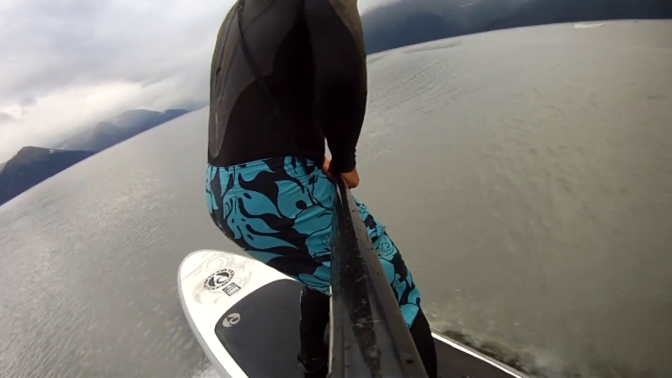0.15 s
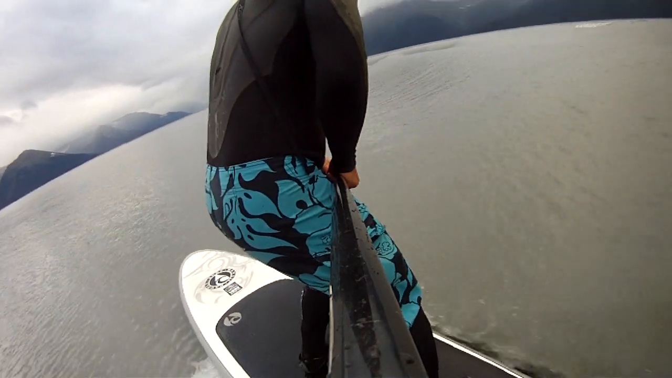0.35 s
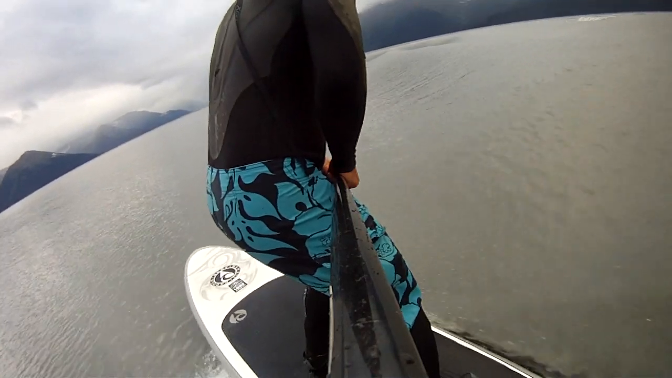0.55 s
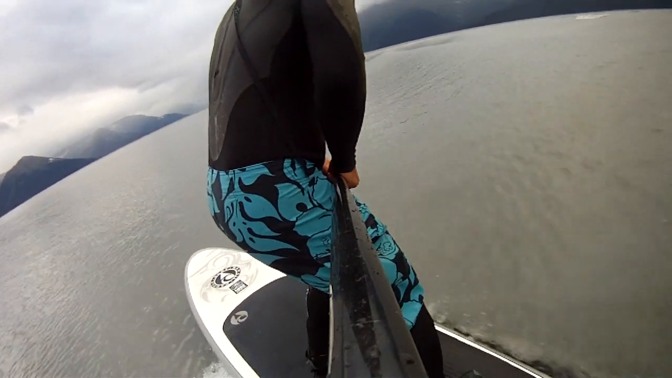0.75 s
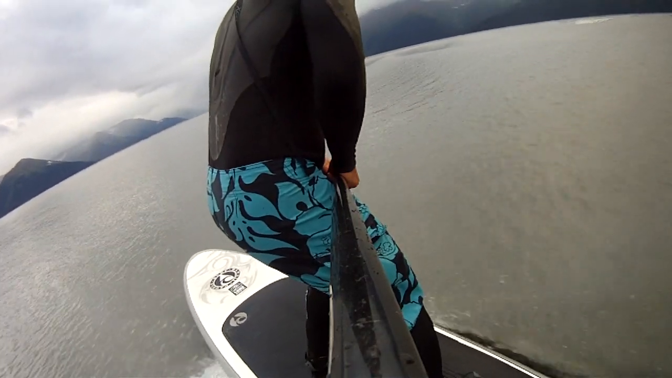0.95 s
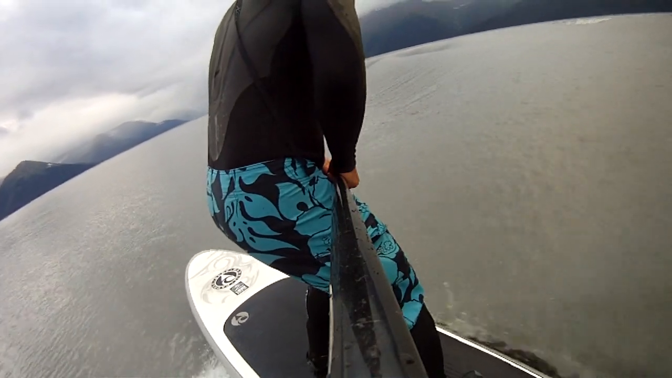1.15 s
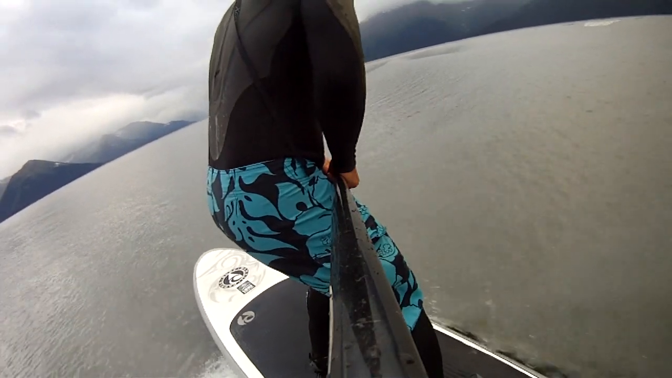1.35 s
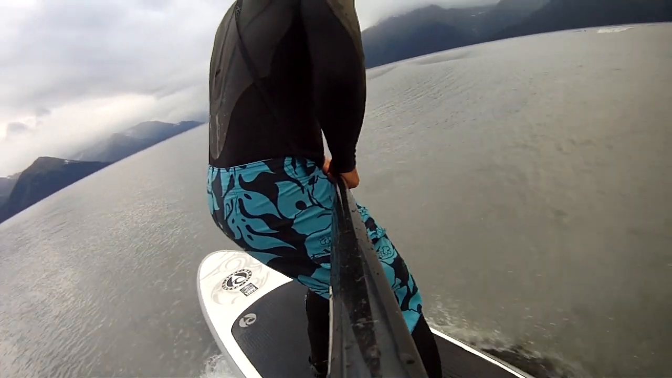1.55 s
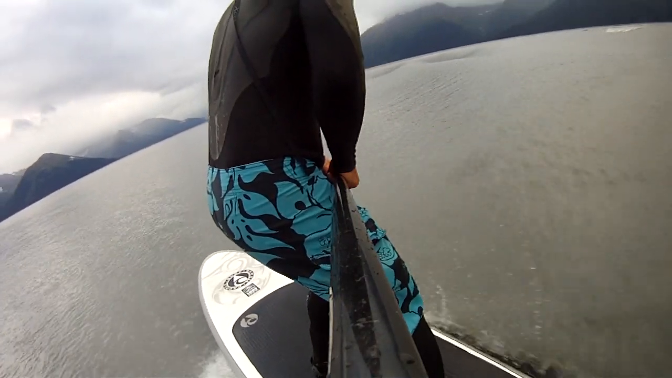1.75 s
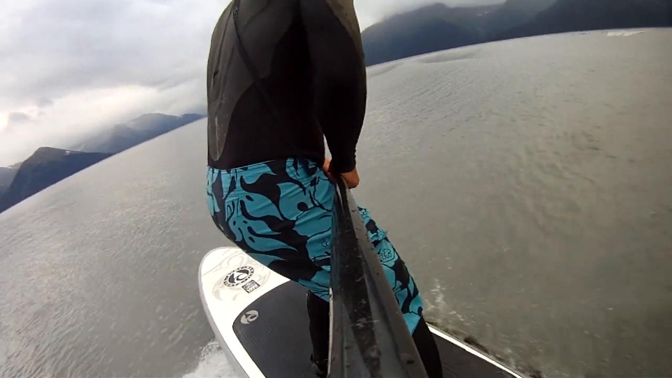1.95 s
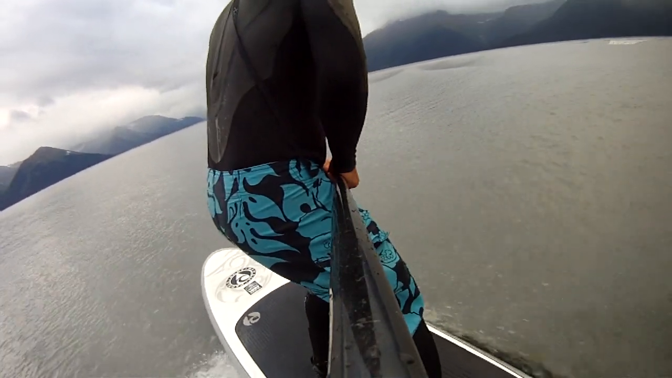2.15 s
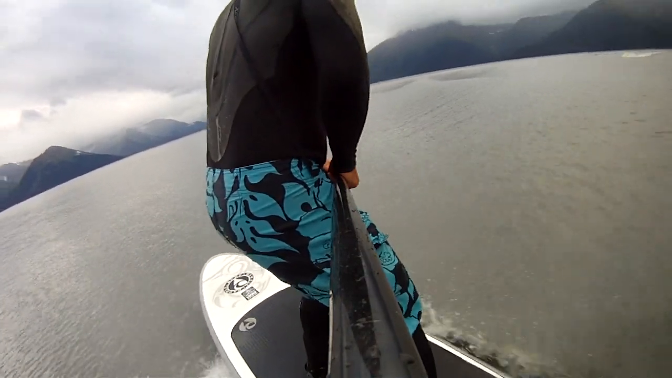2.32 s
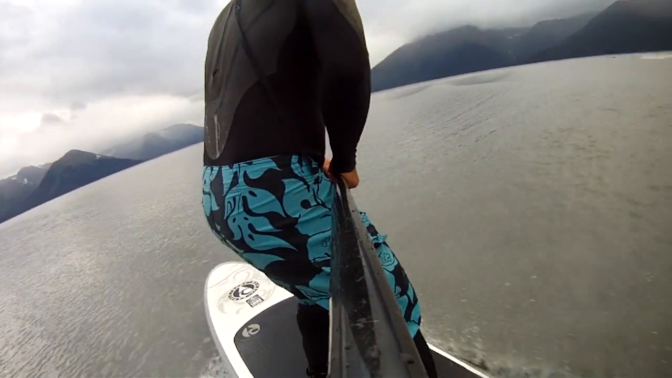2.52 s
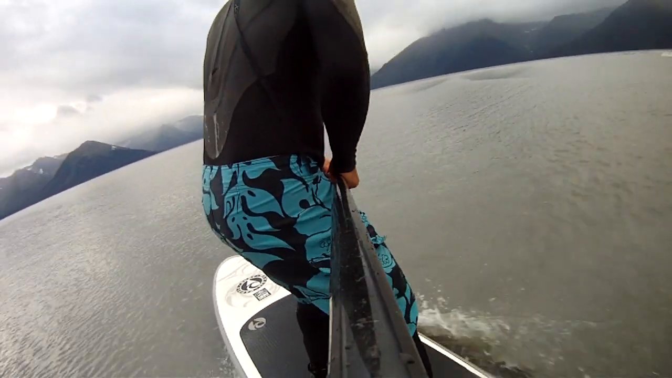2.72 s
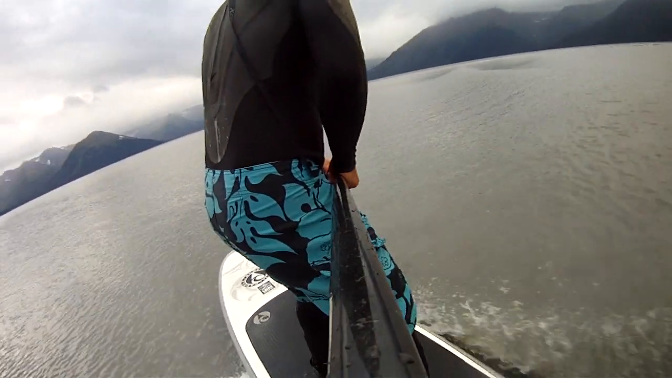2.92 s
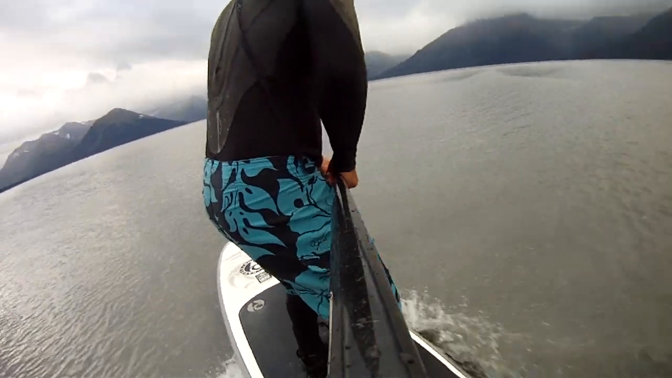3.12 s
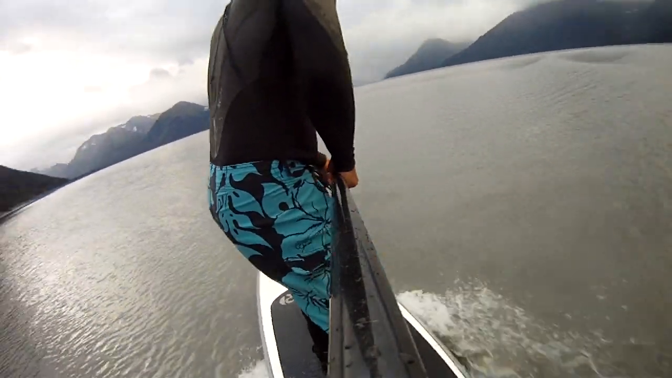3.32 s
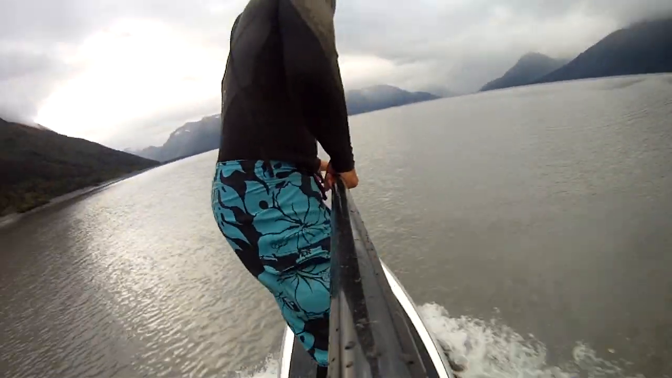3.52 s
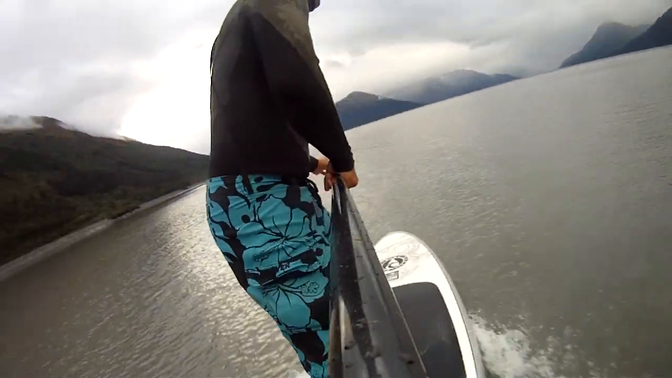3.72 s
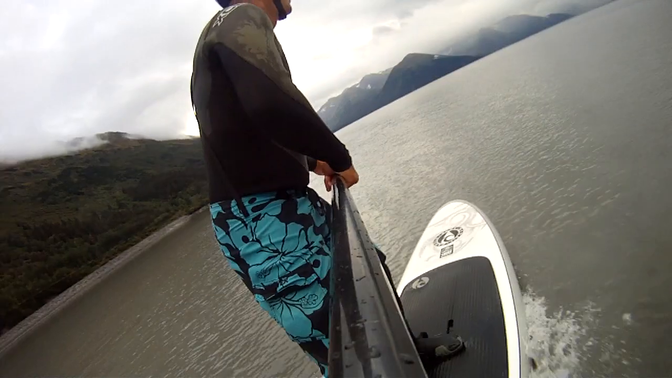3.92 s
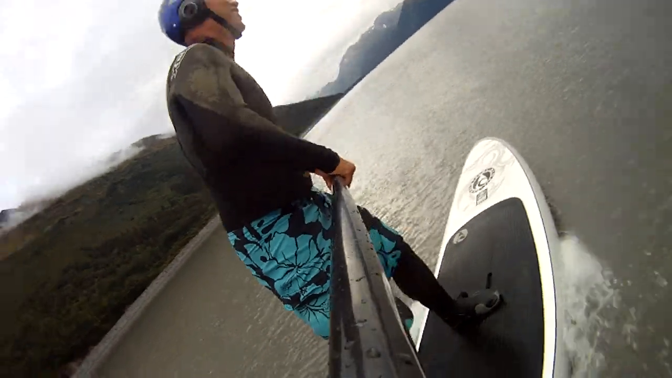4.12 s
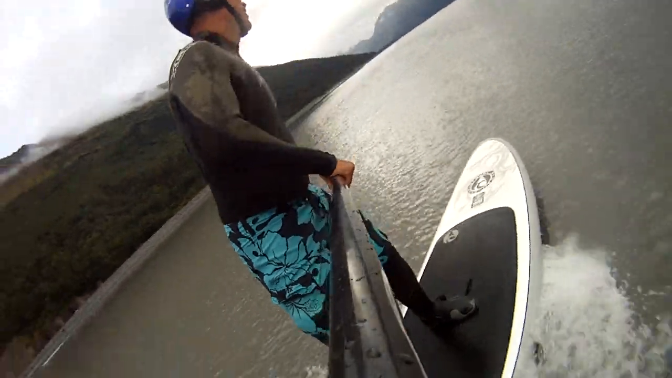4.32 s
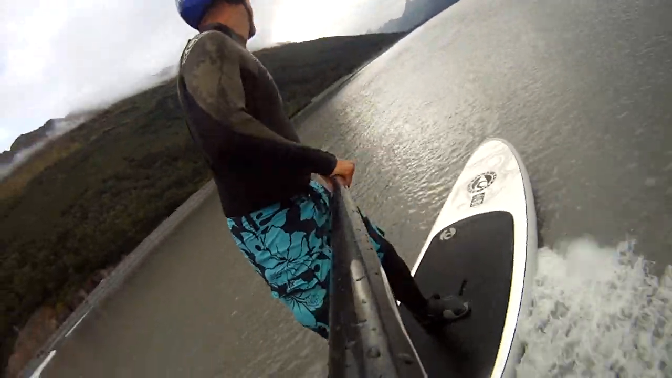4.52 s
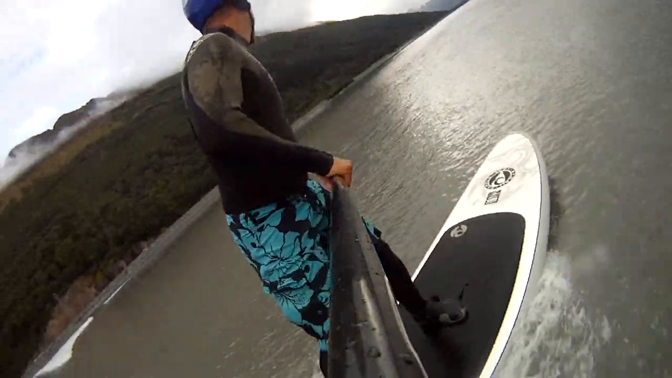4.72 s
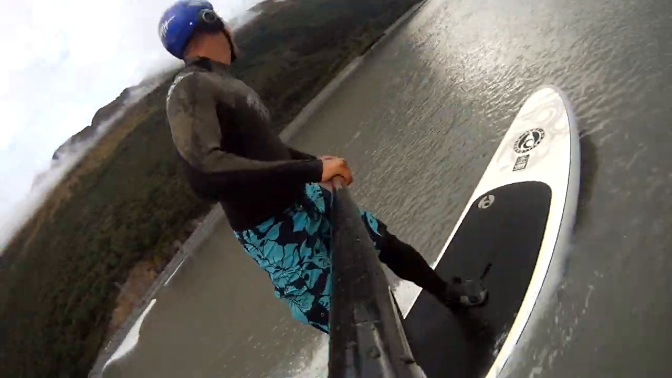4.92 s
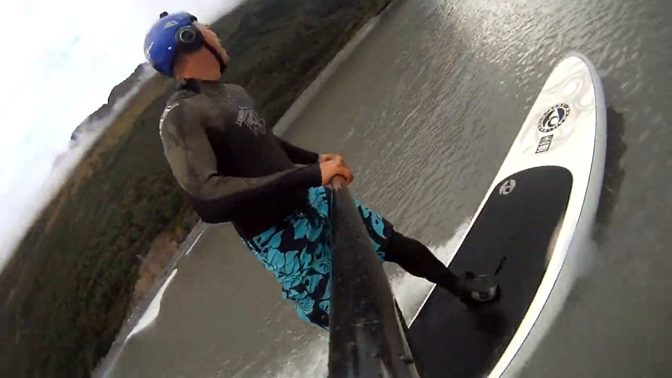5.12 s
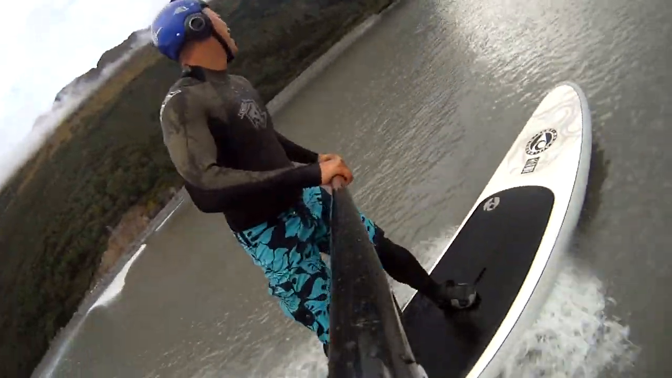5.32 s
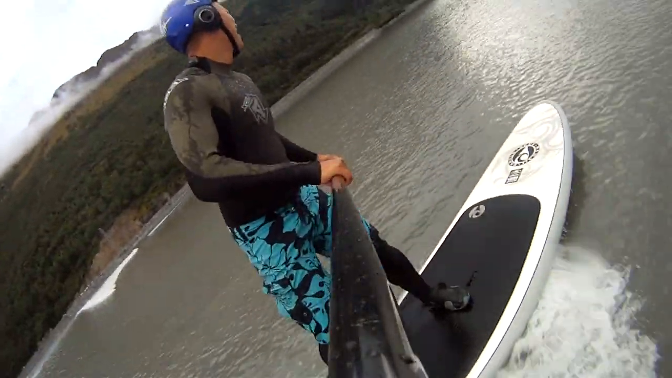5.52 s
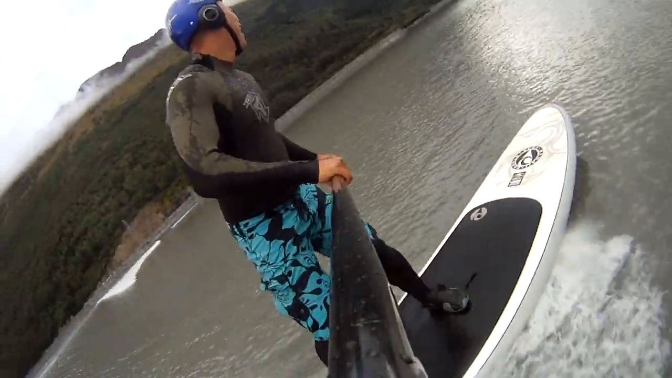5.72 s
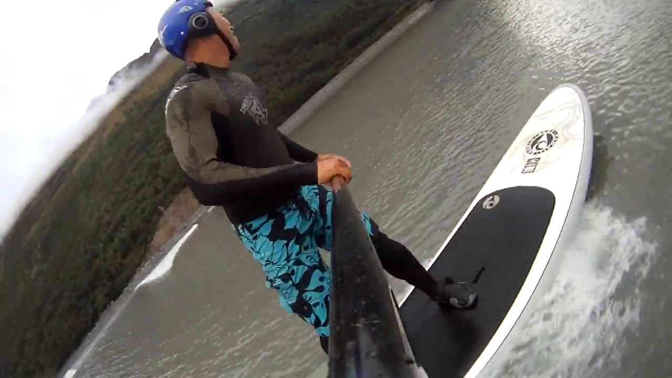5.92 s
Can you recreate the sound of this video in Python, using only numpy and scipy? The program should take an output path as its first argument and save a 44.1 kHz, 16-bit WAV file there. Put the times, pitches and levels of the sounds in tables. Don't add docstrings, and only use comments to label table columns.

```python
import sys
import numpy as np
from scipy import signal
from scipy.fft import rfft, irfft, next_fast_len
from scipy.io import wavfile
from scipy.ndimage import uniform_filter1d, map_coordinates

SR = 44100
rng = np.random.default_rng(int(sys.argv[2]) if len(sys.argv) > 2 else 0)


def elevation(decibels):
    levels = np.asarray(decibels, float)
    return 10 ** (levels / 20)


def bounce(signal):
    frames = np.transpose(np.atleast_2d(signal))
    limited = np.clip(frames, -1, 1)
    pcm = np.round(limited * 32767).astype(np.int16)
    wavfile.write(sys.argv[1], SR, pcm)


N = 262836

# centre in Hz, width in Hz, level in dB.
HOUSING_MODES = [(2284, 506, -5), (2638, 644, -6), (3556, 530, -6), (3860, 530, -11), (4420, 950, -11),
                 (5454, 700, -6)]
# centre in Hz, width in Hz, level in dB.
LOW_MODES = [(1170, 180, -6), (1295, 120, 0), (1680, 170, -4.5), (1850, 220, -10)]


def unit(x):
    return x / np.sqrt(np.mean(x ** 2) + 1e-20)


def curves(rows):
    seconds, *columns = np.transpose(rows)
    return [np.interp(np.arange(N) / SR, seconds, column) for column in columns]


def wobble(rate):
    knots = rng.standard_normal(int(N * rate / SR) + 4)
    return map_coordinates(knots, [np.arange(N) * rate / SR])


def filtered(x, response):
    m = next_fast_len(len(x) + 8192)
    return irfft(rfft(x, m) * response(np.fft.rfftfreq(m, 1 / SR)), m)[:len(x)]


def modes(table):
    def response(f):
        total = 0
        for k, (hz, width, db) in enumerate(table):
            total = total + (-1) ** k * elevation(db) * 1j * f * width / (hz * hz - f * f + 1j * f * width)
        return total
    return response


def swings(table):
    out, t = np.zeros(N), np.arange(N) / SR
    for crest, db, hz, rise, t60 in table:
        build_up = np.exp(-((t - crest) / rise) ** 2 / 2)
        decay = elevation(-60 * np.abs(t - crest) / t60)
        swell = np.where(t < crest, build_up, decay)
        out = out + elevation(db) * swell * np.cos(2 * np.pi * hz * (t - crest))
    return out


def turbulence(patchy_db, grain_db):
    z = signal.stft(rng.standard_normal(N), nperseg=512)[2]
    field = uniform_filter1d(rng.standard_normal(z.shape), size=5, axis=0)
    patches = unit(uniform_filter1d(field, size=8, axis=1))
    noise = signal.istft(z * elevation(patchy_db * patches), nperseg=512)[1][:N]
    return noise * elevation(grain_db * wobble(400) + 0.63 * wobble(40))


def water():
    # time in seconds, spray flying at the camera in dB, slosh stirred by the paddle in dB over calm.
    ride = [(0.0, -42.5, 0.5), (0.4, -44, 0), (1.0, -43, 0), (1.58, -43.5, 0), (2.2, -44, 1),
            (2.75, -44.5, 1), (3.3, -46, 2), (3.6, -46.5, -0.5), (3.8, -49, 1.5), (3.95, -48, 7.5),
            (4.2, -48.5, 2), (4.5, -47.5, -1), (4.83, -50, 3.5), (5.0, -53, 2.5), (5.15, -53.5, 0.5),
            (5.35, -50.5, 0.5), (5.62, -47.5, -1), (5.96, -49.5, 1.5)]
    # frequency in Hz, level in dB per Hz.
    bed_spectrum = [(70, -20), (110, -6.5), (200, -3), (700, -5), (1500, 1.5), (3000, -6.5), (3950, -31.5),
                    (6000, -9)]
    spray_db, slosh_db = curves(ride)
    spray_change = spray_db + 44

    def level(calm_db, spray_share, slosh_share):
        return elevation(calm_db + spray_share * spray_change + slosh_share * slosh_db)

    def low_pairs(f):
        return modes(LOW_MODES[:2])(f) - modes(LOW_MODES[2:])(f)

    hz, db = np.transpose(bed_spectrum)
    surge_db = 0.47 * wobble(10)
    wash = unit(filtered(turbulence(0.84, 0.43), low_pairs))
    spray = unit(filtered(turbulence(0.71, 1.05), modes(HOUSING_MODES[:4])))
    fizz = unit(filtered(turbulence(0.55, 0.43), modes(HOUSING_MODES[4:])))
    bed = unit(filtered(turbulence(1.4, 1.5), lambda f: elevation(np.interp(np.log(f + 1), np.log(hz), db))))
    mix = level(-44, 0.91, 0.73) * wash
    mix += level(-41, 1.04, 0.01) * spray
    mix += level(-45, 1.11, -0.16) * fizz
    mix += level(-43, 0.19, 1.05) * bed
    return elevation(surge_db) * mix


def shaft():
    # centre in Hz, width in Hz, level in dB.
    bending = [(54.64, 7.83, 6.5), (38.5, 25.7, -2), (73, 26, -15.5)]
    # centre in Hz, width in Hz, level in dB.
    second_bending = [(106, 22, 0)]
    # time in seconds, level in dB.
    chop = [(0.0, -36), (0.6, -33.5), (1.3, -36), (2.15, -34), (2.35, -39), (2.58, -34), (2.9, -40.5),
            (3.2, -39.5), (3.3, -26.5), (3.5, -31), (3.62, -37.5), (4.0, -33.5), (4.4, -38.5), (4.68, -42),
            (4.86, -33), (5.1, -37.5), (5.5, -38.5), (5.96, -37)]
    # time in seconds, depth in dB, half length in seconds.
    lulls = [(0.228, 14, 0.024), (0.492, 6, .02), (.69, 14, 0.016), (0.808, 8.5, 0.027), (0.908, 22, 0.013),
             (1.09, 8, 0.021), (1.348, 9.5, 0.037), (1.654, 15, 0.013), (2.242, 11, 0.029),
             (2.736, 6, 0.04), (2.845, 14, 0.012), (3.353, 18, 0.026), (3.56, 10, 0.022), (3.735, 11, .02),
             (4.103, 15, 0.022), (4.24, 14, 0.056), (4.52, 6, .05), (4.645, 3, 0.023), (4.91, 10, 0.02),
             (5.02, 7, 0.014), (5.296, 17, .015), (5.39, 5.5, 0.022), (5.67, 4, 0.028), (5.96, 8, 0.043)]
    # highest crest in seconds, peak in dB, pitch in Hz, build-up in seconds, t60 in seconds.
    jolts = [(3.159, -20, 45.3, 0.012, 0.084), (3.235, -18.5, 61.4, 0.0056, 0.14),
             (3.259, -11.5, 50, 0.0062, 0.089), (3.455, -15.5, 45, 0.0064, 0.039),
             (3.774, -7.5, 61, 0.0044, 0.1), (3.7708, -15, 113, 0.0044, .04),
             (3.735, -23, 55, 0.0061, 0.14), (3.858, -17, 82, 0.012, 0.098),
             (3.8715, -20.5, 74.6, 0.0087, 0.19), (3.942, -21.5, 70, 0.0052, 0.065),
             (3.987, -16.5, 54.3, .008, 0.055), (4.002, -24, 105, .005, .05), (4.05, -33, 70, .01, .1),
             (4.799, -23, 91, 0.0031, 0.036), (4.827, -28.5, 70, 0.005, 0.33), (4.91, -21.5, 59, 0.018, .2),
             (5.08, -27, 52.6, 0.0065, 0.81)]
    drum = filtered(filtered(rng.standard_normal(N), modes(bending)), modes([(55, 51, 0)]))
    swing = uniform_filter1d(np.abs(signal.hilbert(drum, next_fast_len(N))[:N]), size=1500)
    flutter = elevation(1.5 * wobble(28))
    steady = unit(flutter * drum / swing ** .9)
    upper = unit(filtered(filtered(rng.standard_normal(N), modes(second_bending)), modes(second_bending)))
    t = np.arange(N) / SR
    drum_db = curves(chop)[0]
    for s, depth, half_length in lulls:
        drum_db = drum_db - depth * np.exp(-((t - s) / half_length) ** 2 / 2)
    return elevation(drum_db) * steady + elevation(-60.0) * upper + swings(jolts)


def squeak():
    # time in seconds,
    # pitch in Hz, level in dB.
    slips = [(3.4045, 1405, -24), (3.4065, 1870, -27), (3.4095, 2320, -23.5), (3.415, 1203, -17.5),
             (3.419, 2050, -21), (3.425, 1300, -21), (3.426, 743, -30), (3.433, 1405, -23),
             (3.434, 2300, -38), (3.4382, 762, -20), (3.4435, 1272, -28), (3.4462, 722, -23),
             (3.4505, 570, -27), (3.4142, 2180, -22), (3.4235, 1930, -22), (3.414, 758, -32),
             (3.4205, 780, -30), (3.4255, 3520, -34), (3.412, 3150, -35)]
    rise_s, fall_s = .0016, .0032
    pitch_sag, scrape_share = 8, .4
    half = SR // 50
    out, t = np.zeros(N), np.arange(-half, half) / SR
    scrape = unit(filtered(rng.standard_normal(N), modes(LOW_MODES + HOUSING_MODES[:2])))
    jitter = .06 * wobble(700)
    rough_db = 2.5 + 2.2 * wobble(600)
    for k, (s, hz, db) in enumerate(slips):
        own = slice(k * len(t), (k + 1) * len(t))
        start = round(s * SR) - half
        phase = 2 * np.pi * np.cumsum(hz * (1 - pitch_sag * t + jitter[own])) / SR
        slip = np.sin(phase) * elevation(rough_db[own])
        swell = np.exp(-(t / np.where(t < 0, rise_s, fall_s)) ** 2 / 2)
        out[start:start + len(t)] += elevation(db) * swell * (slip + scrape_share * scrape[own])
    return out


def mount():
    # start in seconds, length in seconds, level in dB, centre in Hz, width in octaves.
    rattles = [(3.244, 0.027, -43, 250, 0.94), (3.439, 0.034, -36, 350, 0.91),
               (3.7644, 0.0053, -28, 1760, 0.66), (3.765, 0.012, -32, 300, .6),
               (3.84, 0.026, -36.5, 1160, 1), (3.848, 0.049, -38.5, 246, 0.73),
               (3.973, 0.026, -35.5, 330, 0.91), (3.44, 0.035, -41.5, 200, 0.2),
               (4.003, 0.04, -38.5, 695, 0.8), (3.973, 0.053, -39, 1280, 0.39),
               (4.02, 0.013, -43, 1590, 0.36), (4.197, 0.19, -55, 120, 0.3), (4.42, 0.075, -53, 108, 0.21),
               (4.653, .08, -51, 106, 0.21), (4.792, 0.13, -51.5, 170, 0.24), (4.811, 0.025, -48, 1700, .5),
               (4.95, 0.38, -56, 168, 0.51)]
    # highest crest in seconds, peak in dB, pitch in Hz, build-up in seconds, t60 in seconds.
    ticks = [(3.7652, -17, 2700, .0004, .006), (3.7656, -20, 3350, .0006, .009),
             (3.7665, -23, 2050, .0006, .012), (3.7684, -19, 1220, .0012, .018),
             (3.7667, -22, 750, .001, .02), (3.78, -32, 1280, .002, .04), (3.838, -28, 1340, .002, .02),
             (3.974, -21, 1150, .0015, .03), (4.026, -27, 1700, .001, .02), (4.801, -31, 170, .003, .05),
             (4.825, -34, 150, .004, .06), (4.849, -36, 160, .004, .06), (4.05, -33, 1200, .002, .04),
             (4.145, -37, 1300, .008, .1), (4.54, -39, 1320, .008, .1)]
    out, t = np.zeros(N + SR), np.arange(SR // 2) / SR
    for s, length, db, hz, octaves in rattles:
        band = lambda f: np.exp(-(np.log2((f + 1) / hz) / octaves) ** 2 / 2)
        swell = np.exp(-(t / length) ** 3) * (1 - np.exp(-t / 0.001))
        chatter = filtered(rng.standard_normal(len(t)), band) * swell
        out[round(s * SR):][:len(t)] += elevation(db) * unit(chatter) * np.sqrt(length / t[-1])
    return out[:N] + swings(ticks)


def creak():
    start_s, length_s, level_db = 3.997, .043, -28
    start_hz, climb_hz_per_s, overtone_db = 138, 2000, -7
    t = np.clip(np.arange(N) / SR - start_s, 0, None)
    pitch = (start_hz + climb_hz_per_s * np.minimum(t, .1)) * (1 + .05 * wobble(200))
    phase = 2 * np.pi * np.cumsum(pitch) / SR
    buzz = sum(elevation(overtone_db * k) * np.cos((k + 1) * phase) for k in range(4))
    swell = (1 - np.exp(-t / .003)) * np.exp(-(t / length_s) ** 3)
    return elevation(level_db + 2.8 * wobble(150)) * buzz * swell


def drops():
    # start in seconds, level in dB (the tick starts 5 dB below it), pitch in Hz.
    falling = [
        (0.2044, -24, 2330),
        (0.2605, -24, 2190),
        (0.3895, -33, 2310),
        (0.7138, -33, 1770),
        (1.2532, -20.5, 2290),
        (1.4442, -22, 2400),
        (1.7409, -29, 2370),
        (1.803, -23, 2500),
        (2.171, -37, 2460),
        (2.354, -18.5, 2320),
    ]
    out, t = np.zeros(N + SR), np.arange(SR // 50) / SR
    for s, db, hz in falling:
        fade = elevation(db - 5 - 60 * t / .008)
        out[round(s * SR):][:len(t)] += fade * np.sin(2 * np.pi * hz * t)
    return out[:N]


def hum():
    # time in seconds, level in dB.
    singing = [
        (4.36, -73),
        (4.42, -58),
        (4.58, -56),
        (4.66, -76),
    ]
    level_db = curves(singing)[0] + 1.5 * wobble(25)
    pitch = 548 + 6 * wobble(20)
    return elevation(level_db) * np.sin(2 * np.pi * np.cumsum(pitch) / SR)


def scene():
    mix = water() + shaft() + squeak() + mount() + creak() + drops() + hum()
    return np.tile(mix, (2, 1))


def low_pass(x):
    return signal.sosfilt(signal.butter(12, 15830, fs=SR, output="sos"), x)


def record(dry):
    edge = filtered(dry[0], lambda f: 1 / (1 + (f / 5600) ** 20))
    slow = signal.resample_poly(edge, 40, 147, window=("kaiser", 8))
    held = signal.resample_poly(np.repeat(slow, 4), 147, 160)[:N]
    held = filtered(held, lambda f: f < 15310)
    mono = np.pad(held, (0, N - len(held)))
    return low_pass(np.tile(mono, (2, 1)))


dry = scene()
out = record(dry)
bounce(out)
```